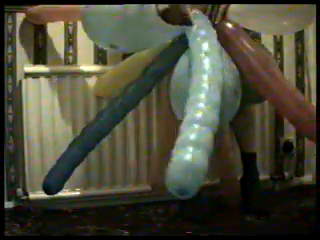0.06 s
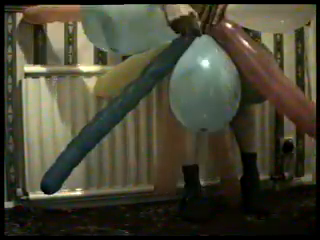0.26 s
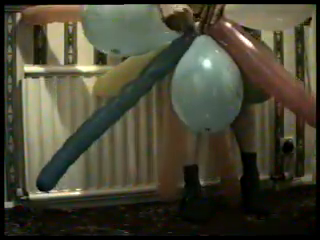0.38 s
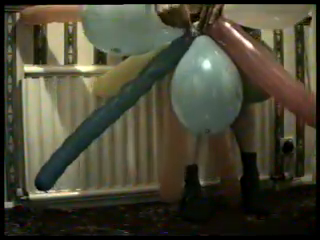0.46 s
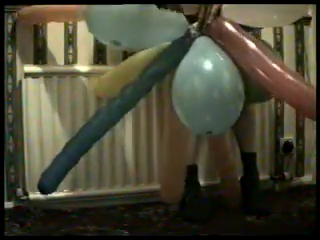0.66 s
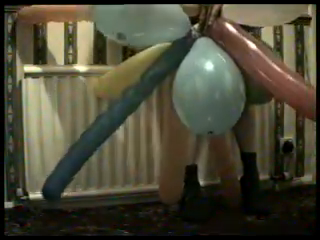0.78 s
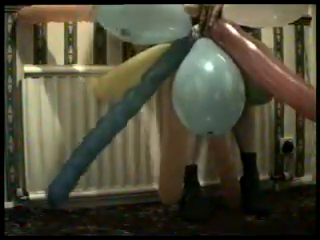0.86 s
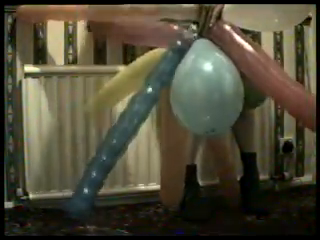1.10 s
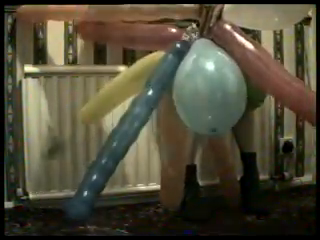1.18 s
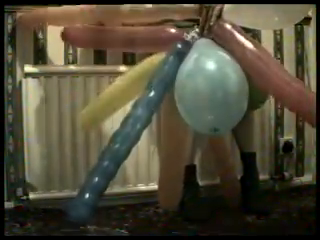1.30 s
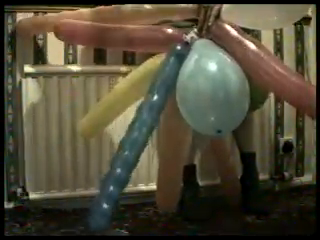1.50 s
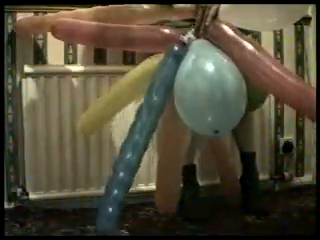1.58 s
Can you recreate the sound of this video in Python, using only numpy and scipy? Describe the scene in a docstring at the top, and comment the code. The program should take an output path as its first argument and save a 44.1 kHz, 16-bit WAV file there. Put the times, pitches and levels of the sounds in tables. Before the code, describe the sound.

Two loud balloon pops ring out indoors, roughly a second apart, the first preceded by a moment of soft rubber rubbing. The bangs distort a little on the microphone and leave a short room echo over faint hiss.

```python
"""Two balloons burst in a live room

A hanging bunch in front of a steel radiator, heard at one microphone, almost mono. Rubber rubs as
the first balloon is gripped, then a pin bursts it and a second one. Each blast and its echoes off
nearby surfaces overload the microphone; the room's wash and a faint radiator ring die into hiss and hum."""
import sys
import numpy as np
from scipy import signal
from scipy.fft import rfft, irfft, next_fast_len
from scipy.io import wavfile

SR = 44100
rng = np.random.default_rng(int(sys.argv[2]) if len(sys.argv) > 2 else 0)


def log_audio(samples):
    """Write samples as a 16-bit WAV file to the path given in sys.argv[1]."""
    # one column per channel
    frames = np.atleast_2d(samples).T
    # limit to full scale, then quantise
    limited = np.clip(frames, -1, 1)
    pcm = np.round(limited * 32767).astype(np.int16)
    wavfile.write(sys.argv[1], SR, pcm)


N = 72765

# The bursts: t/s, blast/dB, air resonance f/Hz, its t60/s, low push/dB, early echoes/dB, their span/s,
# room/dB, factor on the room's decay time, radiator/dB
BURSTS = [(0.2286, -9.5, 967, 0.03, -18.5, -12.5, 0.018, -17, 1.053, -44.5),
          (1.1488, -6.5, 704, 0.026, -27.5, -14.5, 0.0057, -18.5, 0.86, -54)]
# Room decay, before each burst's factor: f/Hz, t60/s
ROOM_DECAY = [(100, 0.65), (260, 0.53), (700, 0.45), (1840, 0.5), (3600, 0.44), (7000, 0.39), (11000, 0.37)]


def amp(db):
    """Decibels to gain."""
    return 10 ** (np.asarray(db) / 20)


def unit(x):
    """Scale to rms 1."""
    return x / np.sqrt(np.mean(x ** 2) + 1e-20)


def along(points, hz):
    """Interpolate (f/Hz, value) points on a log frequency axis."""
    f, values = np.transpose(points)
    return np.interp(np.log(hz + 1), np.log(f + 1), values)


def since(start):
    """Seconds since start, zero before."""
    return np.maximum(np.arange(N) / SR - start, 0)


def fade(t, t60):
    """Exponential decay, 60 dB down at t60."""
    return np.exp(-np.log(1000) * t / t60)


def ring(t, hz, t60):
    """A damped sine."""
    return np.sin(2 * np.pi * hz * t) * fade(t, t60)


def filtered(x, response):
    """Filter x by a response given as a function of frequency."""
    size = next_fast_len(N + SR // 2)
    return irfft(rfft(x, size) * response(np.fft.rfftfreq(size, 1 / SR)), size)[:N]


def noise(spectrum):
    """Noise of rms 1, shaped by (f/Hz, level/dB) points."""
    return unit(filtered(rng.standard_normal(N), lambda hz: amp(along(spectrum, hz))))


def hiss_and_hum():
    """The noise floor: steady hiss, faint mains hum and a thin high whine."""
    hiss_spectrum = [(20, 0), (45, 14.5), (75, 10.5), (160, 15.5), (330, 7.5), (600, 4), (1000, 1),
                     (2500, -1.5), (8500, -3), (9400, 2.5), (9770, 8), (10250, -1), (11600, -5),
                     (12500, -15)]  # f/Hz, relative level/dB
    hum_and_whine = [(49.6, -67.5), (9765, -78.5)]  # f/Hz, rms level/dB
    tones = sum(amp(db) * np.sqrt(2) * np.sin(2 * np.pi * (hz * since(0) + rng.random()))
                for hz, db in hum_and_whine)
    return amp(-62) * noise(hiss_spectrum) + tones


def slipping(slips_per_s=910, t60=0.45):
    """The rough envelope of many tiny slips of rubber, each dying away in the room."""
    slips = (rng.random(N) < slips_per_s / SR) * rng.exponential(size=N)
    power = irfft(rfft(slips) * rfft(fade(since(0), t60) ** 2), N)
    return unit(np.sqrt(np.abs(power)))


def settling(release_s=0.12):
    """Balloons brush each other until the second burst; one soft bump comes just before it."""
    rustle_spectrum = [(100, -19), (300, -3), (600, 1.5), (1400, -3.5), (2500, -12), (5000, -10.5),
                       (9000, -19.5)]  # f/Hz, relative level/dB
    release = np.exp(-since(BURSTS[1][0]) / release_s)
    rustle = amp(-65) * slipping() * noise(rustle_spectrum) * release
    bump = amp(-60.5) * ring(since(1.105), hz=150, t60=0.04)
    return rustle + bump


def rubbing(release_s=0.03):
    """Gripped rubber slips and the swinging bunch stirs the air, until the first burst."""
    grip = [(0.0, -45.5, -53), (0.036, -42, -52), (0.05, -45, -55.5), (0.106, -41.5, -51),
            (0.118, -40, -48.5), (0.198, -47.5, -56.5), (0.22, -41.5, -54.5)]  # course of the rub: t/s, relative body level/dB, relative treble level/dB
    body_spectrum = [(60, -22), (110, -6.5), (165, 1.5), (280, -1.5), (370, -1.5), (450, 0.5), (600, 1),
                     (800, -2), (1250, -2.5), (2000, -8.5), (3000, -15.5), (6000, -53)]  # f/Hz, relative level/dB
    treble_spectrum = [(800, -35.5), (2200, -3), (3500, -2), (5500, -6), (8000, -12.5), (12000, -24.5)]  # f/Hz, relative level/dB
    air_spectrum = [(15, -10), (38, 9.5), (55, -6.5), (110, -30.5), (400, -72)]  # f/Hz, relative level/dB
    t = since(0)
    times, body_db, treble_db = np.transpose(grip)
    body = amp(np.interp(t, times, body_db)) * noise(body_spectrum)
    treble = amp(np.interp(t, times, treble_db)) * noise(treble_spectrum)
    rubber = amp(2.5) * slipping() * (body + treble)
    air = amp(-55) * noise(air_spectrum)
    return (rubber + air) * np.exp(-since(BURSTS[0][0]) / release_s)


def radiator(t):
    """Steel panels behind the balloons ring on after the bang."""
    panel_modes = [(283, -2, 1.3), (460, 3.5, .95), (625, -2.5, 1.44), (1170, 11, .6), (1265, -11.5, 1.6),
                   (1320, -13.5, .7), (1448, -2, 0.94)]  # f/Hz, relative level/dB, t60/s
    return sum(amp(db) * ring(t, hz, t60) for hz, db, t60 in panel_modes)


def standing_waves(t, stretch):
    """The room's strongest modes, dying with the wash."""
    room_modes = [(205, -10.5), (294, -4.5), (431, -1.5), (497, -5), (572, -14), (614, 4.5), (807, -5.5),
                  (957, -12), (1067, -2.5), (1254, -4)]  # f/Hz, relative level/dB
    return sum(amp(db) * ring(t, hz, stretch * along(ROOM_DECAY, hz)) for hz, db in room_modes)


def room_wash(start, colour, stretch, build_s=0.00089):
    """Diffuse reverberation over standing waves; each frequency dies at its own speed."""
    # The wash stays level after the bang, longest in the top treble, as with a limiter recovering.
    hold = [(2000, 0.018), (5000, 0.01), (9000, 0.04)]  # f/Hz, time before fading/s
    hz, frame_times, bands = signal.stft(noise(colour), SR, nperseg=256)
    age = np.maximum(frame_times - start - along(hold, hz)[:, None], 0)
    t60 = stretch * along(ROOM_DECAY, hz)[:, None]
    wash = signal.istft(bands * fade(age, t60), SR)[1][:N]
    t = since(start)
    return (wash + amp(-12) * standing_waves(t, stretch)) * (1 - np.exp(-t / build_s))


def early_echoes(t, span, rise_s=0.00027, fall_s=0.0022):
    """A dense volley off the nearby wall, floor and radiator."""
    echo_spectrum = [(30, -33.5), (70, -15.5), (150, -9), (310, 6.5), (600, -1), (790, 1.5), (960, -6),
                     (1150, -5), (1700, -7.5), (2600, -6.5), (5000, -20.5), (12000, -54.5)]  # f/Hz, relative level/dB
    envelope = (1 - np.exp(-t / rise_s)) * np.exp(-np.maximum(t - span, 0) / fall_s)
    return noise(echo_spectrum) * envelope


def tear(start, peak_hz=3300, swell_s=0.0009):
    """A bright rip runs through the skin, swelling into the blast and dying as fast."""
    rip = noise([(peak_hz / 10, -20), (peak_hz, 0), (peak_hz * 2, -20), (SR / 2, -50)])
    return amp(-32.5) * rip * np.exp(-np.abs(np.arange(N) / SR - start) / swell_s)


def balloon_bursts(radiate_hz=90):
    """The skin rips, the freed air rings briefly over a low push, and room and radiator answer."""
    wash_spectra = [
        [(40, -39.5), (120, -18.5), (210, -11.5), (320, -5.5), (600, -7), (860, -9), (1100, -6.5), (1400, -10),
         (2600, -12), (4000, -10.5), (7400, -22.5), (11400, -37), (12500, -53)],
        [(40, -23.5), (110, -24.5), (200, -5.5), (290, 2.5), (440, 2), (500, -2), (680, -3), (900, -10),
         (1240, -6.5), (1700, -11), (2400, -8.5), (3400, -3.5), (5500, -12.5), (9800, -25), (11600, -33.5),
         (12500, -46)],
    ]  # each burst's colour in the room: f/Hz, relative level/dB
    sound = np.zeros(N)
    for burst, colour in zip(BURSTS, wash_spectra):
        start, blast_db, hz, t60, push_db, early_db, span, room_db, stretch, steel_db = burst
        t = since(start)
        sound += tear(start)
        sound -= amp(blast_db) * ring(t, hz, t60)
        sound += amp(push_db) * ring(t, hz=105.7, t60=0.065)
        sound += amp(early_db) * early_echoes(t, span)
        sound += amp(room_db) * room_wash(start, colour, stretch)
        sound += amp(steel_db) * radiator(t)
    # A source this small radiates bass poorly.
    return filtered(sound, lambda f: 1j * f / (radiate_hz + 1j * f))


def scene():
    """All sources at one microphone; its two channels are almost the same."""
    stereo_width = [(60, -28.5), (300, -48), (1200, -51.5), (2600, -26), (11000, -26)]  # side signal: f/Hz, level/dB relative to the mid
    mid = balloon_bursts() + rubbing() + settling() + hiss_and_hum()
    side = filtered(mid, lambda hz: 1j * amp(along(stereo_width, hz)))
    return np.array([mid + side, mid - side])


def record(dry):
    """The microphone input overloads softly on the bangs, thins the deep bass and cuts off the top."""
    ceiling, knee = amp(-6.4), 3.5
    low_cut_hz, top_hz = 21, 12250
    squashed = dry / (1 + np.abs(dry / ceiling) ** knee) ** (1 / knee)

    def passband(hz):
        return 1j * hz / (low_cut_hz + 1j * hz) / np.sqrt(1 + (hz / top_hz) ** 200)

    return np.array([filtered(channel, passband) for channel in squashed])


dry = scene()
out = record(dry)
log_audio(out)
```